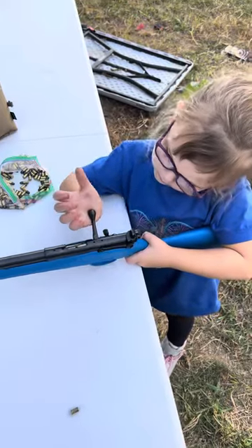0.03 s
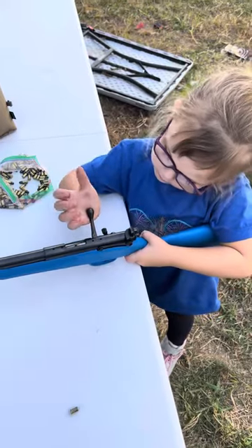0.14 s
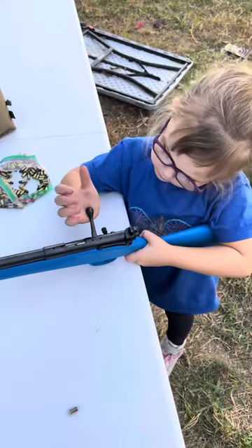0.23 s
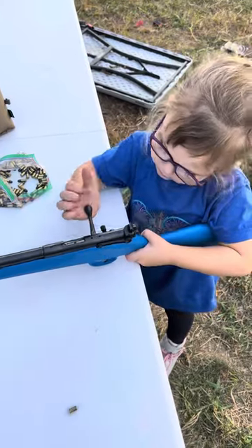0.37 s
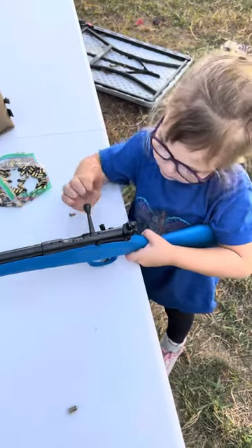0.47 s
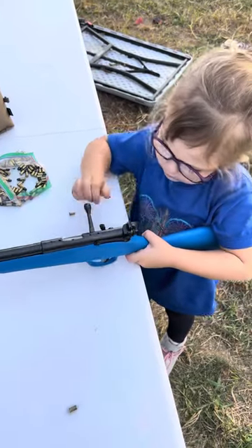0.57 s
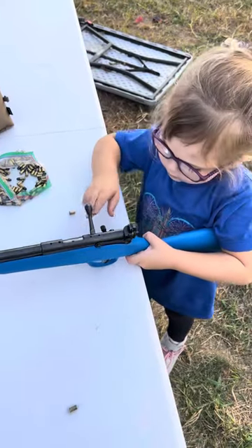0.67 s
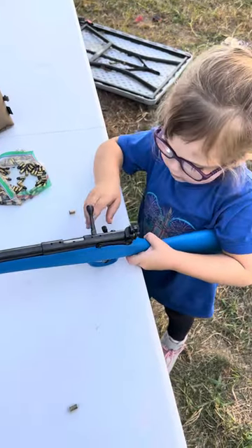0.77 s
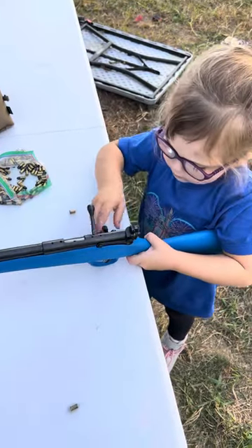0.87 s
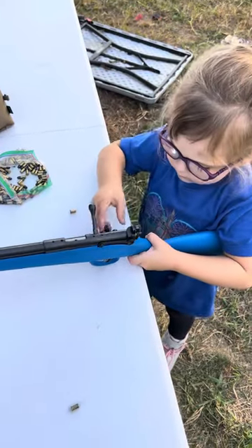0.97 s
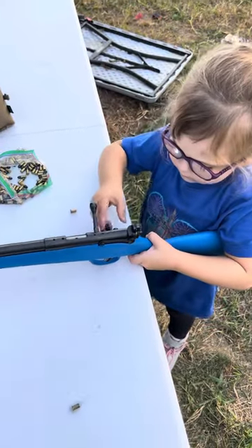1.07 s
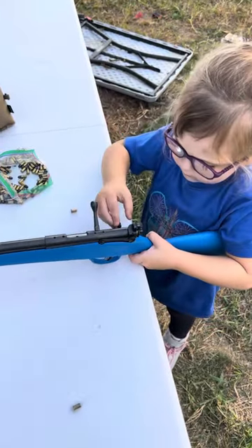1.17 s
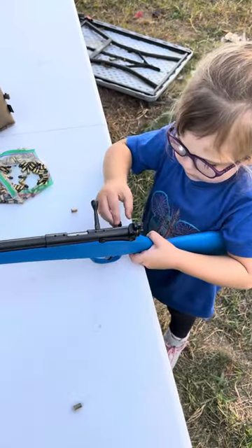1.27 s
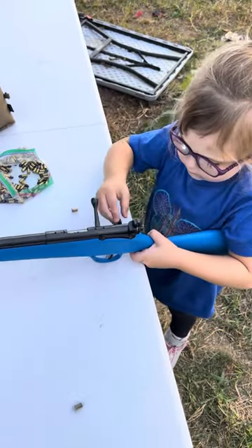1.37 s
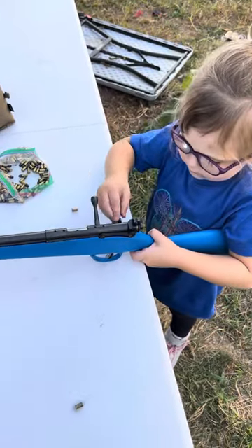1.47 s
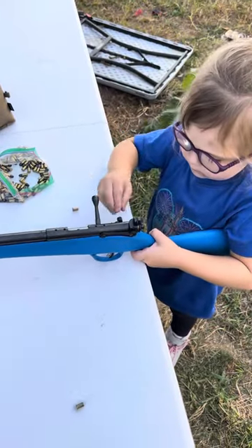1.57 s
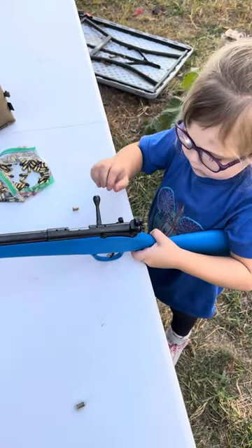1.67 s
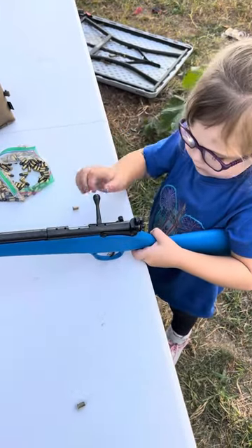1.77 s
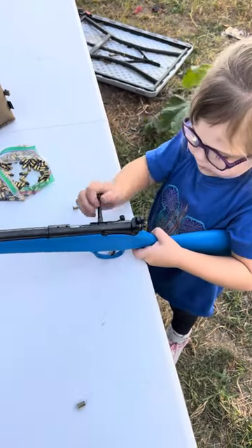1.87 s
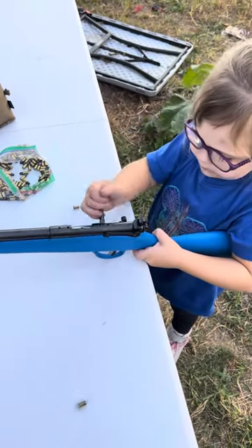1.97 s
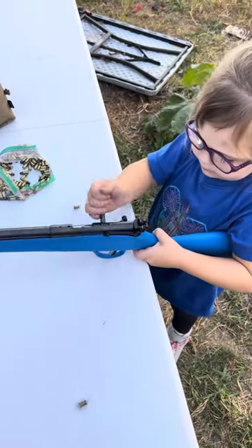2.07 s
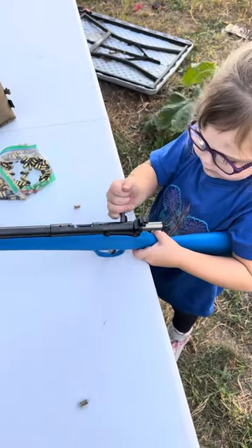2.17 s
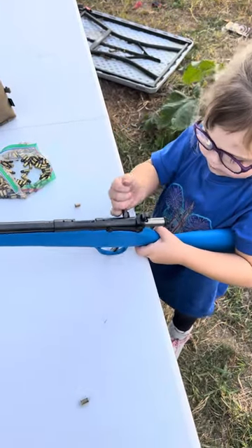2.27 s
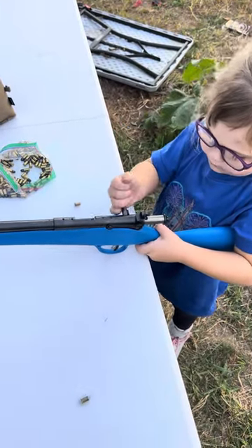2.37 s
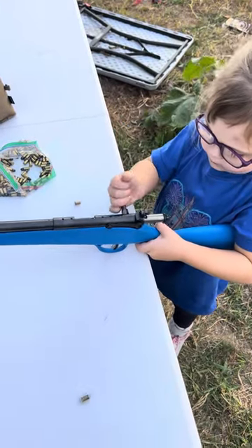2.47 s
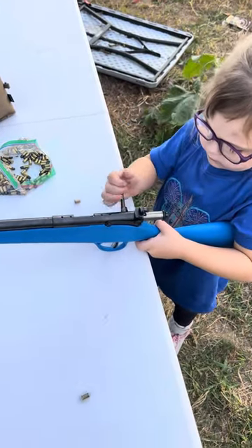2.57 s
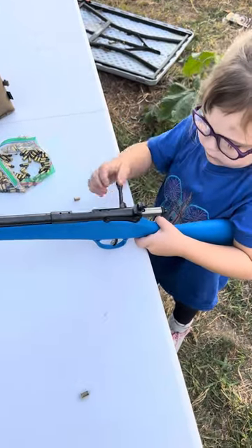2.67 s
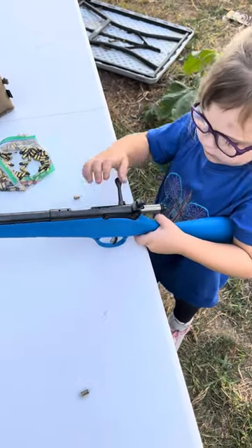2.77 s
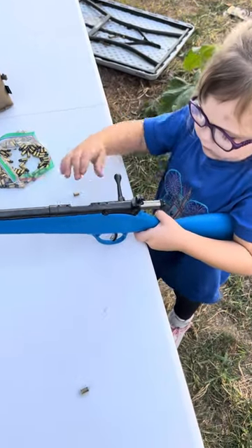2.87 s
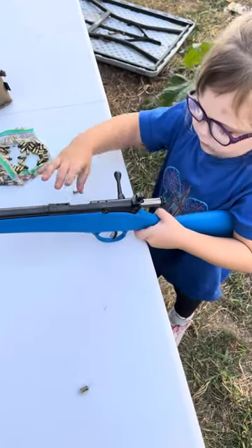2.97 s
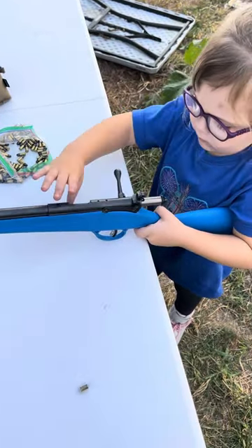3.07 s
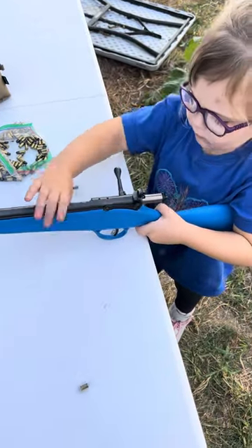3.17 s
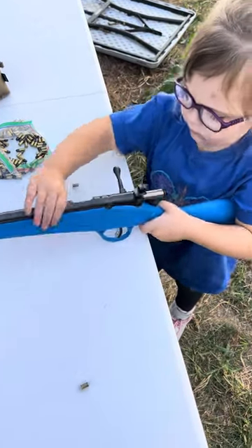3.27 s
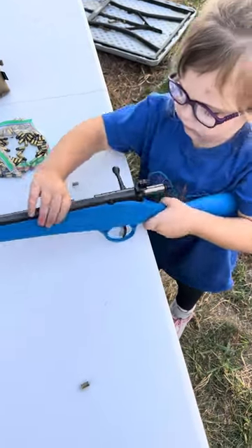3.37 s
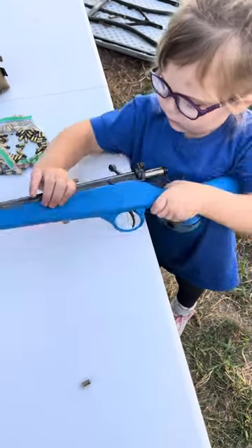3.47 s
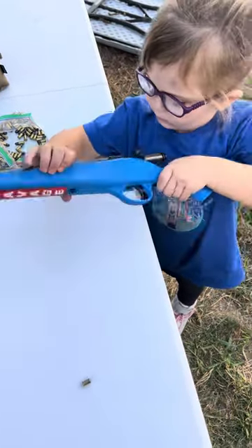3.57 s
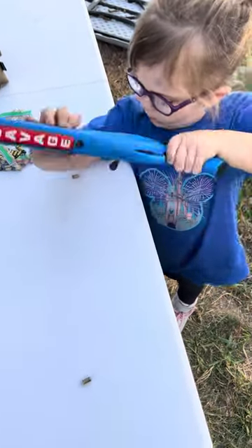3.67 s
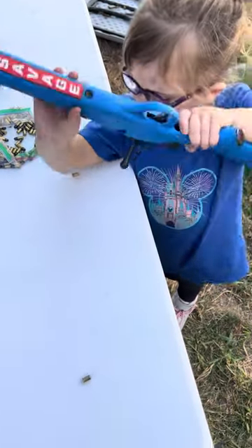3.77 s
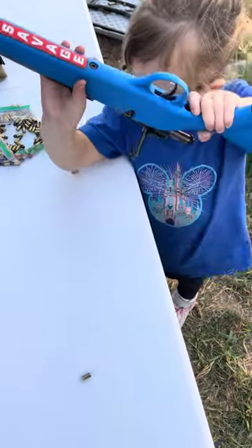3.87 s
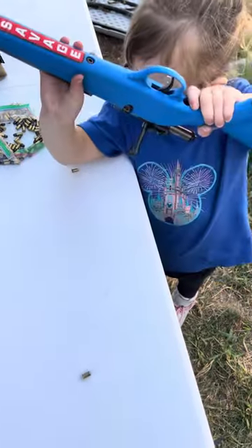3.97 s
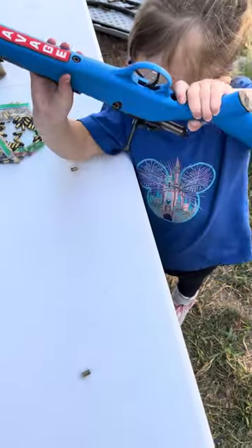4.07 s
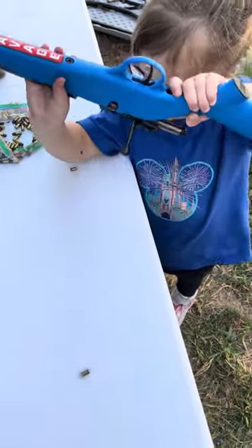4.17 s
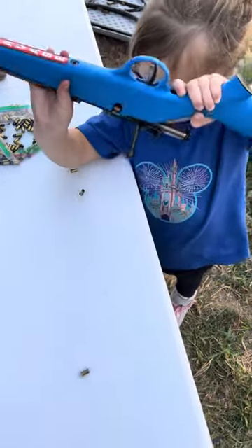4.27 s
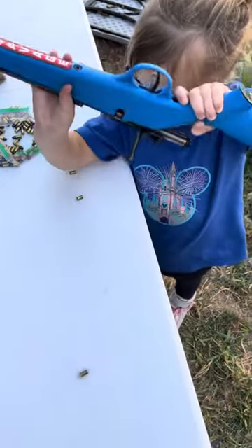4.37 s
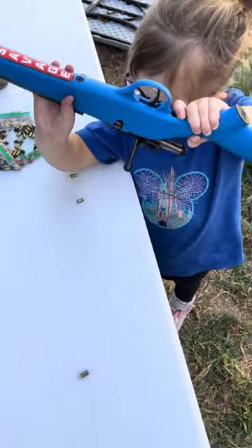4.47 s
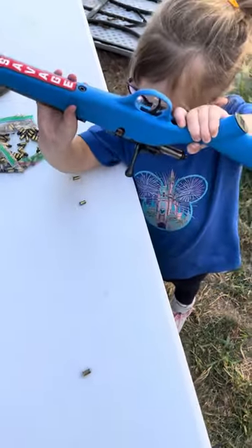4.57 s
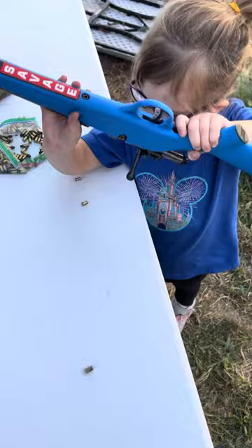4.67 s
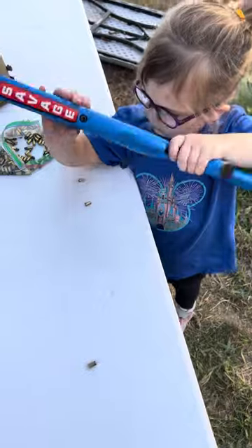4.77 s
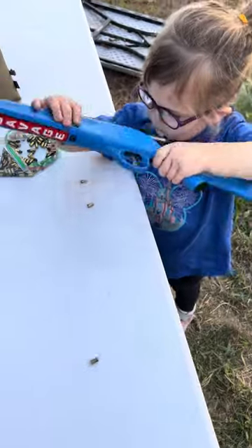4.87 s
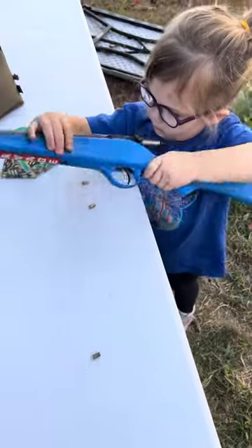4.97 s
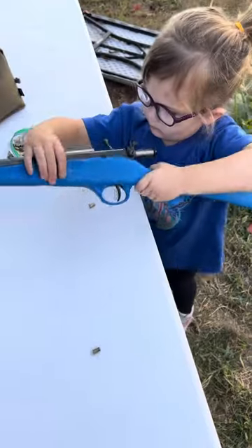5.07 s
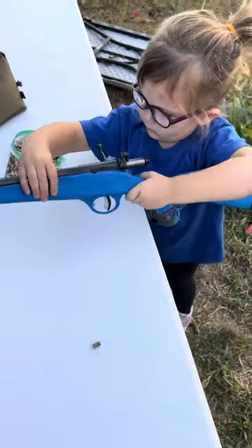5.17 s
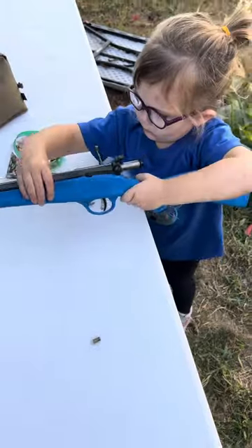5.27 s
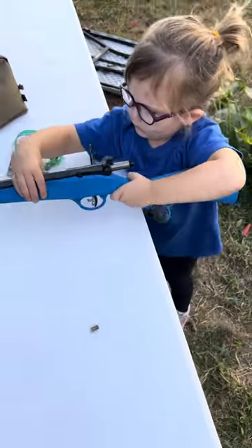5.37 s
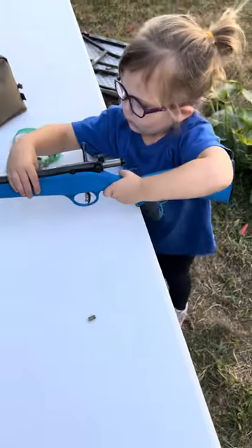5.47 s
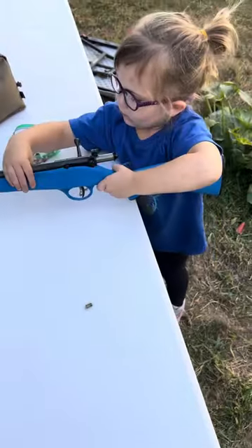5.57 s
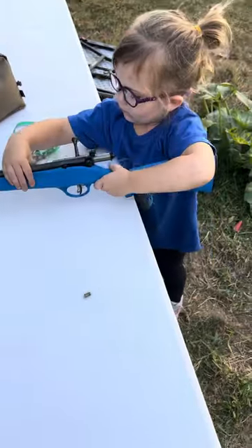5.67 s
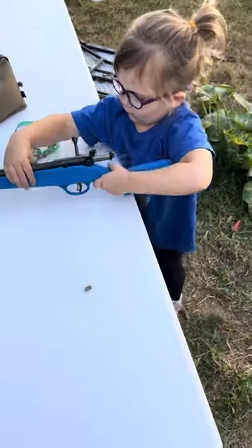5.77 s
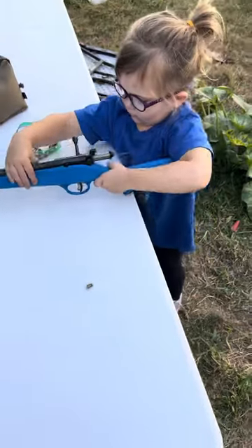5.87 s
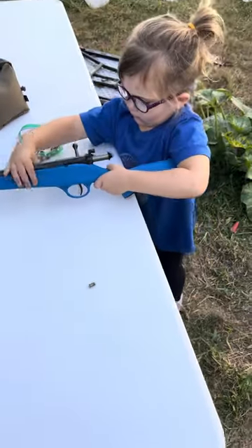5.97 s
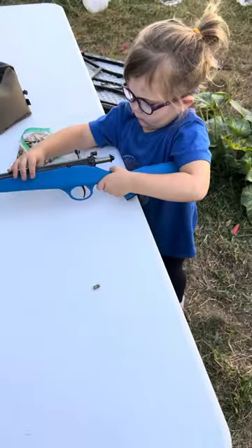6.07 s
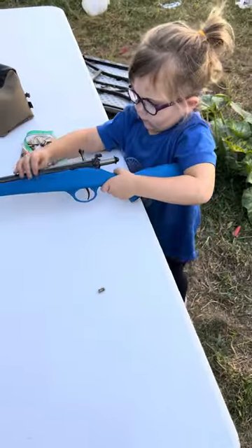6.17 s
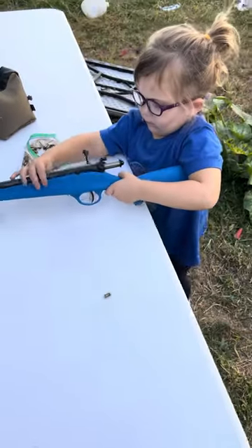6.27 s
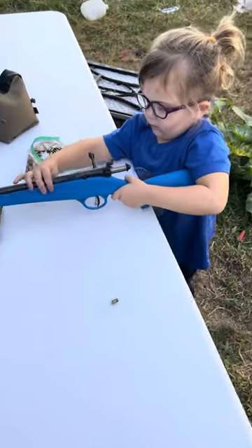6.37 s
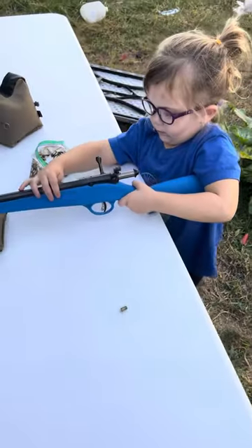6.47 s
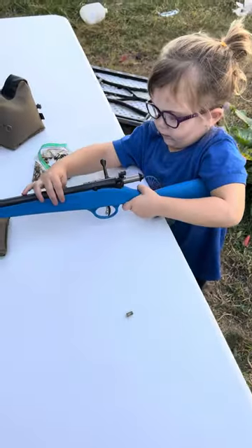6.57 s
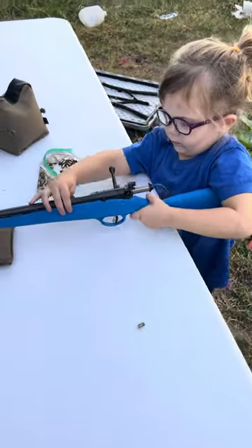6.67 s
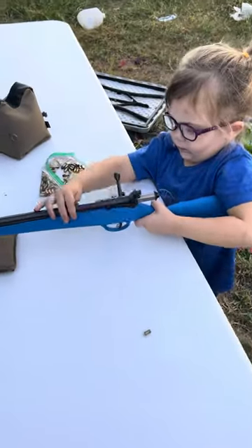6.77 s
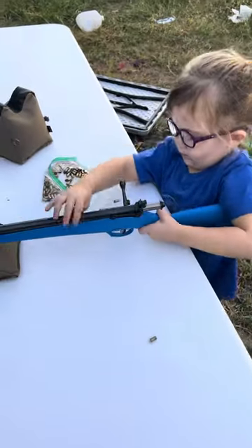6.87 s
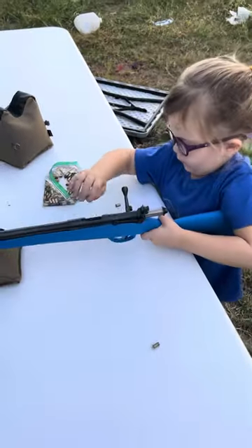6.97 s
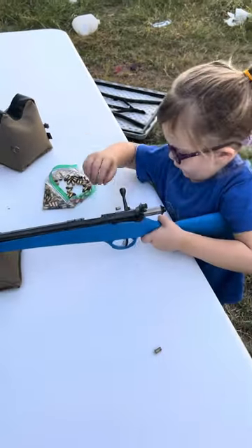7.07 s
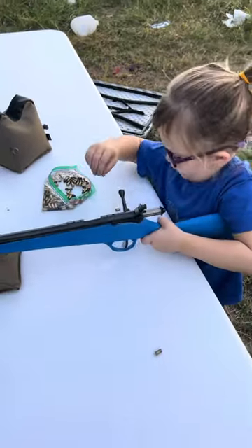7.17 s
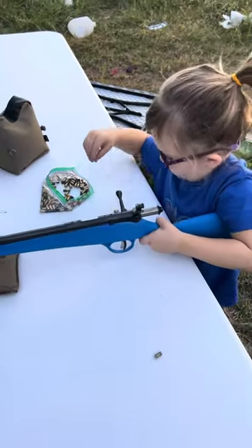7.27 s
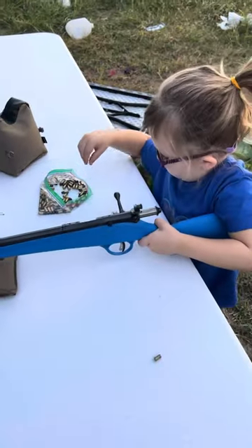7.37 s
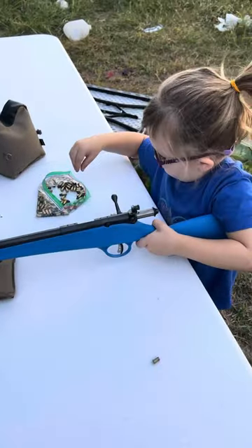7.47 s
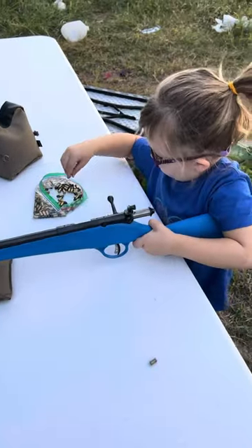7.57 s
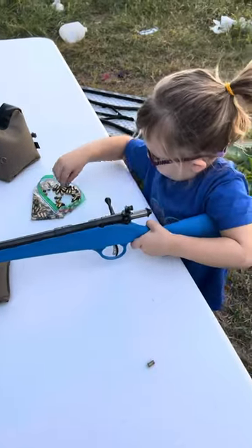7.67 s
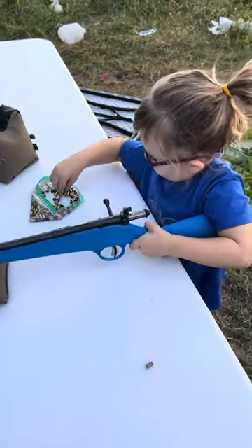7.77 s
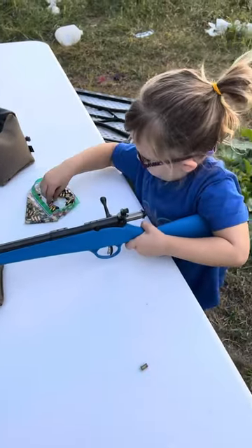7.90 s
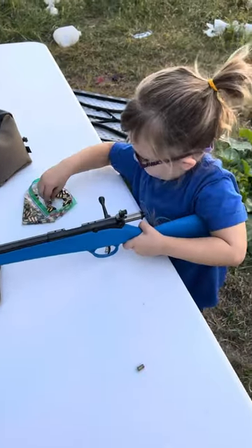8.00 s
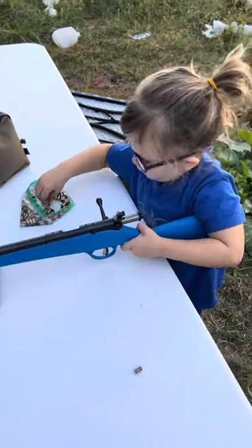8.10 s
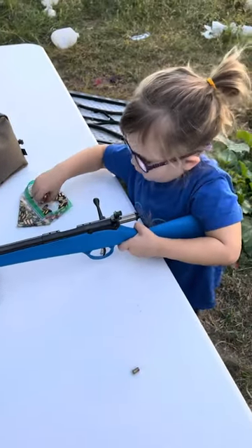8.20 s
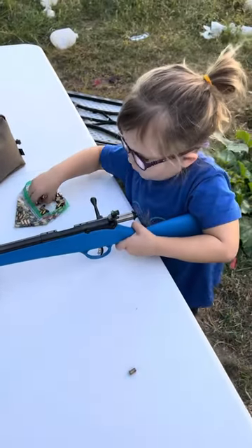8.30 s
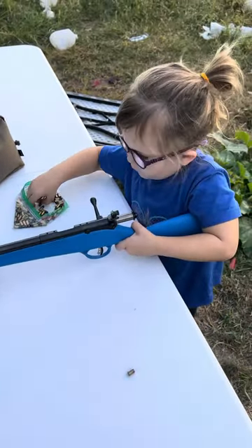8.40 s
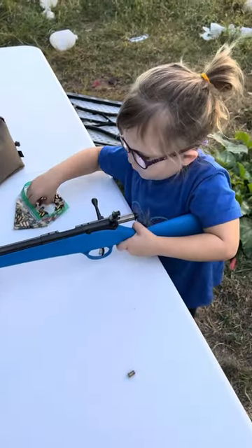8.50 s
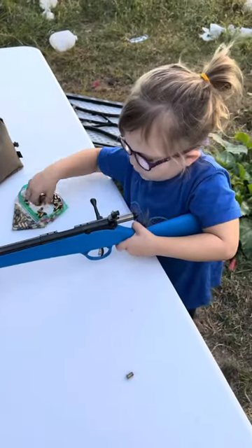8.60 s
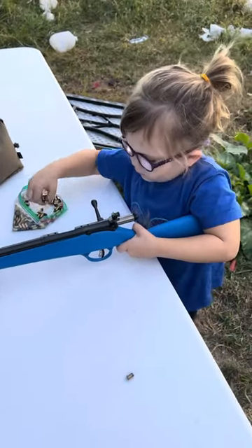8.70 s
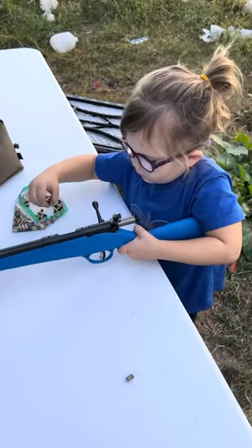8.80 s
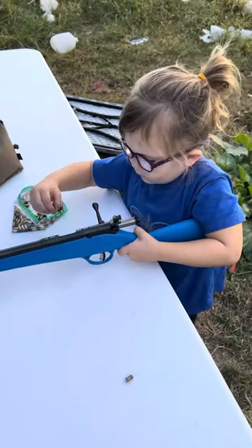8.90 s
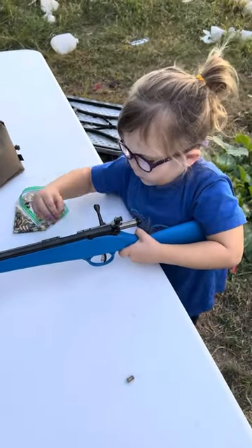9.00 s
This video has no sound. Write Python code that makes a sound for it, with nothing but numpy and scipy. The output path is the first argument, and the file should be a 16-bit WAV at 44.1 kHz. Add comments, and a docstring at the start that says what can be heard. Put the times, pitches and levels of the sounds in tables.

```python
"""Outdoors at a hollow plastic table: a small rifle close below a phone held above it, recorded in stereo.
The steel bolt is closed, opened and drawn back, an empty brass case drops and bounces, the rifle is laid
down and fingers tap among cartridges: gritty contacts ring decaying modes, and the table answers low.
Four near insects, built of sagging tones, sing over a far chorus; shaped noise makes the cloth rustle,
the rubs and scuffs, and the rumble of table and grip."""
import sys
import numpy as np
from scipy import signal
from scipy.fft import rfft, irfft
from scipy.io import wavfile
from scipy.ndimage import uniform_filter1d

SR = 44100
rng = np.random.default_rng(int(sys.argv[2]) if len(sys.argv) > 2 else 0)


def unload_audio(sound):
    """Save the sound as a 16-bit wav file, at the path given as the first command line argument."""
    columns = np.transpose(np.atleast_2d(sound))
    # keep every value between -1 and 1, then stretch to whole-number steps
    steps = np.round(np.clip(columns, -1, 1) * 32767)
    wavfile.write(sys.argv[1], SR, steps.astype(np.int16))


N = 398663
T = np.arange(N) / SR  # s

# level of the far chorus as heard, lower for a while after the loud bolt: start_s [s], level_db [dB]
CHORUS_LEVEL = [(0.0, -64), (2.03, -64), (2.2, -70), (4.58, -65.5), (5.76, -63), (6.72, -63), (7.58, -65),
                (9.04, -63.5)]
# level of the rumble of hands on rifle and table: start_s [s], level_db [dB]
RUMBLE_LEVEL = [(0.0, -71), (.65, -61.5), (.85, -71.5), (1.91, -73.5), (2.16, -65), (2.8, -82.5),
                (3.4, -64), (3.62, -73.5), (4.51, -69.5), (5.44, -76.5), (5.66, -47), (5.87, -46.5),
                (6.34, -70.5), (7.68, -73), (7.88, -53), (8.08, -69), (8.66, -62.5), (9.04, -68)]
# noise colours, relative spectral density: pitch_hz [Hz], level_db [dB per Hz]
CHORUS_SPECTRUM = [(2500, -23), (3700, -17.5), (4200, -2), (4800, 2), (5400, -5.5), (5900, -12.5),
                   (7300, -3.5), (7800, -28.5), (12500, -43.5), (13800, -31.5), (15000, -41)]
RUMBLE_SPECTRUM = [(15, -54.5), (25, -28), (52, -5), (70, -1.5), (98, -2.5), (171, -17), (300, -24),
                   (390, -55), (660, -120)]
GRIP_SPECTRUM = [(150, -3), (300, -1), (600, -4), (900, -9.5), (1200, -16.5)]
AIR_SPECTRUM = [(700, -9.5), (1100, -8.5), (1600, -1), (2300, -4), (3000, -11.5), (3800, -12.5)]
RUSTLE_SPECTRUM = [(2000, -4), (4000, -2), (8000, 3), (11000, -11.5), (15500, -8.5), (16500, -30.5)]
SCUFF_SPECTRUM = [(300, -7), (800, -9), (1600, 2), (2500, -6), (4500, -5.5), (7000, -26.5)]
RUB_SPECTRUM = [(300, -24.5), (430, -2), (520, 5.5), (620, -10.5), (1100, -24), (1500, -42.5)]
# low thuds of the table top under bolt, rifle and hands: start_s [s], level_db [peak dB], pitch_hz [Hz]
TABLE_THUDS = [(.009, -42, 61.6), (.516, -48.5, 270), (.54, -52, 91), (.689, -54.5, 109), (1.185, -45, 85),
               (2.175, -46.5, 75), (3.198, -49, 79.2), (3.273, -39.5, 169.5), (3.45, -53.5, 69.87),
               (5.459, -43.5, 70.24), (5.504, -39, 96), (5.688, -25.5, 306), (5.701, -22.5, 128),
               (5.712, -14.5, 79.58), (5.9, -40.5, 111.4), (6.204, -44, 109.9), (7.028, -43, 75.13),
               (7.692, -51.5, 126.2), (7.906, -42, 65), (8.291, -53, 70.0)]
# trilling cricket: time_s [s], strokes_so_far [count]
TRILL_STROKES = [(.053, 1), (2.195, 45), (2.265, 46), (3.265, 67), (3.5, 72), (4.713, 97), (4.99, 103),
                 (5.88, 121), (7.062, 145), (9.114, 187)]
# its two bouts, with a pause between: start_s [s], end_s [s], warm_level_db [dB]
SINGING_BOUTS = [(-1.23, 2.21, -53.5), (3.5, 9.2, -52)]
# katydid: start_s [s, first tick], ticks [count]
KATYDID_BUZZES = [(.13, 16), (.861, 8), (1.347, 14), (1.80, 7), (2.014, 5), (2.666, 8), (3.251, 8),
                  (3.877, 8), (4.511, 7), (5.114, 8), (5.768, 8), (6.355, 9), (6.985, 9), (7.641, 8),
                  (8.271, 8), (8.974, 5)]
# chirping cricket: last_stroke_s [s], strokes [count, after one soft lead-in], level_db [dB]
CRICKET_CHIRPS = [(.551, 3, -64), (.956, 5, -59), (1.32, 5, -58), (1.715, 5, -57), (2.08, 4, -58),
                  (2.494, 4, -65), (2.861, 5, -63), (3.232, 6, -62), (3.625, 6, -61), (4.007, 6, -61),
                  (4.377, 5, -66), (4.71, 4, -61), (5.061, 5, -63), (5.424, 5, -65), (5.844, 4, -56),
                  (6.212, 5, -57), (6.581, 5, -56), (6.961, 5, -57), (7.357, 6, -57), (7.704, 5, -58),
                  (8.088, 5, -58), (8.481, 5, -57), (8.861, 5, -59)]
# soft swells of cloth: middle_s [s], length_s [s], level_db [dB]
CLOTH_SWISHES = [(.3, 0.53, -88.5), (.55, 0.11, -78), (1.22, 0.12, -84), (2.22, 0.13, -80.5),
                 (3.72, 0.25, -82), (4.45, 0.305, -87), (5.0, 0.308, -81.5), (5.26, 0.13, -74),
                 (5.8, 0.39, -74.5), (5.94, 0.1, -70.5), (6.08, 0.14, -73.5), (6.6, 0.26, -82.5),
                 (6.81, 0.087, -69), (7.2, 0.18, -80.5), (7.8, 0.097, -85), (8.3, 0.33, -87.5)]
# brief mid-pitched scuffs and rattles of hands and rifle: middle_s [s], length_s [s], level_db [dB]
SCUFF_SWELLS = [(.92, 0.074, -72.5), (3.22, 0.092, -68), (3.34, 0.0294, -71.5), (3.88, 0.079, -67.5),
                (5.46, 0.049, -64.5), (5.70, 0.036, -49), (1.2, 0.095, -68), (4.29, 0.1, -60.5),
                (8.25, 0.0273, -71), (7.04, 0.074, -68), (7.85, 0.108, -65.5), (7.95, 0.11, -66)]
# soft low rubs close to the ports: middle_s [s], length_s [s], level_db [dB]
PORT_RUBS = [(5.05, 0.19, -74), (5.27, 0.15, -74.5), (5.65, .12, -62.5), (6.32, 0.13, -64),
             (6.67, 0.0403, -72), (6.95, 0.11, -63), (7.27, 0.15, -66), (7.58, 0.09, -70.5)]
# blows: start_s [s], level_db [peak dB], pitch_hz [Hz, main ring of each blow], tilt_db [dB/octave]
TAP_BLOWS = [(.911, -57, 1820, -1.7), (1.881, -52.5, 1000, -1.5), (2.017, -47.5, 1640, -5),
             (2.565, -44, 1561, -4), (2.584, -46, 1750, -4), (2.729, -36, 1690, -3),
             (3.502, -51, 1304, -0.5), (3.583, -41.5, 1474, -3), (3.64, -51, 1616, -.95),
             (4.899, -49, 900, -1.8), (4.948, -30.5, 1300, -2.7), (5.453, -44, 1580, 2),
             (5.685, -27.5, 3400, -1.5), (5.691, -29, 1495, -1), (5.699, -26, 1600, -2.5),
             (5.705, -32.5, 1510, -7), (5.719, -26, 1700, -3), (5.739, -36, 1670, -4),
             (7.455, -56.5, 1537, -2.2), (7.594, -61.5, 1600, 3), (7.824, -52, 1900, -1.8),
             (8.253, -50.5, 1900, .3), (8.277, -43.5, 1670, -1.7), (8.306, -49.5, 1763, -6),
             (8.413, -25.5, 1600, 2), (8.415, -27.5, 875, -1), (8.464, -47.5, 1070, -1.6),
             (8.56, -49, 901, -7), (8.645, -57, 2003, -1.5)]
BOLT_BLOWS = [(1.151, 0, 1450, 2.5), (2.083, -27.5, 996, -0.2), (2.086, -20, 1696, -1.3),
              (2.136, -5.5, 1731, 4.5), (2.138, -1, 1728, 1.47), (2.161, -33.5, 1587, 4.5),
              (2.187, -49.5, 1530, 4)]
CASE_BLOWS = [(4.0595, -48, 6600, 3), (4.2505, -7, 2150, 0.31), (4.2544, -13, 1590, .3),
              (4.3228, -21, 1940, 0.33), (4.333, -21.5, 2170, .32), (4.3485, -34, 2210, .3),
              (4.368, -31.5, 1587, 0.49), (4.529, -47.5, 1500, 0.224)]
# resonances before each blow stretches and scatters them: pitch_hz [Hz], level_db [dB], t60_s [s]
STOCK_MODES = [(675, -5.5, 0.05), (950, -7.5, 0.1), (1227, -7, 0.13), (1660, 7, 0.075), (2194, 0, 0.07),
               (3215, -2, 0.065), (4530, -5.5, 0.038), (7190, 4.5, 0.0098), (10400, -16.5, 0.0079)]
STEEL_MODES = [(852.4, -20, 0.073), (1300, -10, 0.0072), (1738, -1, 0.03), (2570, -10, 0.032),
               (3560, -26.5, 0.039), (4410, -19.5, 0.037), (5154, -11.5, 0.022), (6330, 0, 0.011),
               (7680, -20, 0.034), (9420, -17, 0.026), (11840, -29.5, 0.015), (14760, -42, 0.031)]
BRASS_ON_TABLE_MODES = [(590, -11, 0.0446), (1044, -18.5, 0.093), (1534, -6.5, 0.061), (2164, -8, 0.047),
                        (2696, -8, 0.048), (3270, -5, 0.038), (3930, -9.5, 0.011), (4814, -4.5, 0.029),
                        (6560, -12, 0.033), (7530, -5.5, 0.01), (9500, -11, 0.014), (11670, -14, 0.0033)]
TABLE_MODES = [(71.5, -4, 0.52), (166.1, -6.5, 0.201), (252, -4, 0.12), (329.7, -8, 0.27),
               (480.3, -13, .09), (720, -14, 0.095)]
# how each kind of blow lands: main_ring_db [dB], crack_db [dB], mode_scatter [share], ring_stretch [factor],
# contact_ms [ms], lowest_hz [Hz], table_thump_db [dB], thump_tilt_db [dB/octave]
TAP_LANDING = (11.0, -1.5, .17, .55, 1.1, 310, -20, .96)
BOLT_LANDING = (8.5, 4.5, 0.07, 0.77, 1.01, 780.5, -33, 1.5)
CASE_LANDING = (-4.5, 6.5, -0.05, 0.9486, 0.76, 295, -23.5, 8)
# pings of the brass case, thrown clear or bouncing: start_s [s], level_db [dB]
CASE_PINGS = [(2.15, -40.5), (4.06, -69), (4.325, -57)]
# left port against the right on near blows: pitch_hz [Hz], level_db [dB], lead_rad [radians]
LEFT_PORT = [(150, 0, 0), (300, 2.5, -.6), (750, 3.5, -.6), (1400, 1, -.2), (2150, 0, .6), (2600, 0, -.8),
             (3100, 0, .3), (4000, 0, 0)]

GRIP_DB, GRIP_FOLLOWS = -79.5, 0.4464  # level when the rumble is at -70 dB; dB per dB of rumble
AIR_UNDER_CHORUS_DB = -13
AIR_SWISH_DB, AIR_FOLLOWS = -72.5, .45  # level at a swish of -79 dB; dB per dB of swish
THUD_CYCLES = 18.0  # cycles to fall 60 dB, before ring() shortens the decay
TRILL_HZ, COLD_DROP_HZ, COLD_DROP_DB = 7152, 489.4, 15
WARM_PITCH_S, WARM_LEVEL_S = .72, 0.85  # time constants
BUZZ_DB, BUZZ_FOLLOWS = -66, 0.3  # level when the chorus is at -61 dB; dB per dB of chorus
BLOW_PAN_DB = .7  # left over right
THUMP_PER_DB = -0.1284  # harder blows move the table relatively less (dB per dB above -30)
SLIDE_FROM_S, SLIDE_TO_S, SLIDE_DB = 2.087, 2.137, -30.5
SLIDE_RISE_DB_S, SLIDE_FALL_DB_S, SLIDE_RING_HZ = 2499, 1200, 1730
PING_HZ, PING_T60_S = 13910, 0.17
PAIRS_FROM_S, PAIRS_DB, PAIRS_RISE_DB_S = 4.7, -60, 45
TOP_HZ = 16300  # upper limit of the microphone


def undb(db):
    """Gain of a level in dB."""
    return 10 ** (np.asarray(db) / 20)


def curve(rows):
    """A table of (s, value) read at every sample."""
    return np.interp(T, *np.transpose(rows))


def noise(colour, lo_hz, hi_hz):
    """Random noise with a given spectrum, rms 1 between lo and hi."""
    hz = np.arange(N // 2 + 1) * SR / N + 0.00074  # keeps the logarithm finite
    at_hz, db = np.transpose(colour)
    colour_db = np.interp(np.log(hz), np.log(at_hz), db, -90, -90)
    spectrum = rfft(rng.standard_normal(N)) * undb(colour_db)
    in_band = spectrum[(hz > lo_hz) & (hz < hi_hz)]
    return irfft(spectrum, N) * N / np.sqrt(2 * np.sum(np.abs(in_band) ** 2))


def walk(rate):
    """Random levels held 1 / rate s and smoothed twice; spread near 1."""
    hold = int(SR / rate)
    steps = np.repeat(rng.standard_normal(N // hold + 1), hold)
    return 1.3 * uniform_filter1d(uniform_filter1d(steps, hold), hold)[:N]


def bed(level_db, colour, lo_hz, hi_hz, alike, flicker_db, rate):
    """A diffuse flickering noise; mid and side set the likeness of left and right, -1 to 1."""
    mid = noise(colour, lo_hz, hi_hz)
    side = noise(colour, lo_hz, hi_hz) * np.sqrt((1 - alike) / (1 + alike))
    return np.array([mid + side, mid - side]) * undb(level_db + flicker_db * walk(rate))


def add(out, s, x, pan_db=0.):
    """Mix x into both channels from time s, the left pan_db above the right."""
    i = int(s * SR)
    x = x[max(-i, 0):max(N - i, 0)]
    start = max(i, 0)
    out[:, start:start + len(x)] += x * undb([[pan_db / 2], [-pan_db / 2]])


def swells(events):
    """Level in dB of a row of soft bell-shaped swells whose powers add."""
    power = sum(undb(2 * db) * np.exp(-(2.48 * (T - s) / length) ** 2) for s, length, db in events)
    return 10 * np.log10(power + 1e-14)


def stroke(start_hz, drop_hz, bend, length_s):
    """One wing stroke: a tone that sags as the wings close; rms near 1 in the middle."""
    u = np.linspace(0, 1, int(length_s * SR))
    phase = 2 * np.pi * np.cumsum(start_hz - drop_hz * u ** bend) / SR
    return np.sqrt(2 * np.sin(np.pi * u)) * np.sin(phase + 2 * np.pi * rng.random())


def ring(modes, tilt_db, stretch, spread):
    """Impulse response of decaying modes; each is a cluster of close neighbours that differs every time."""
    hz, db, t60 = np.repeat(np.transpose(modes), 8, axis=1)[:, :, None]
    t60 = np.clip(t60 * stretch, 1e-3, .3)
    t = T[:int(max(t60.max(), .07) * SR) + 1]
    hz = np.minimum(hz * np.exp(spread * rng.standard_normal(hz.shape)), .45 * SR)
    gain = undb(db + tilt_db * np.log2(hz / 1500)) * rng.choice([-1, 1], size=hz.shape)
    return np.sum(gain * np.sin(2 * np.pi * hz * t) * undb(-60 * t / t60), axis=0)


def contact(length_ms):
    """A gritty push that rises and dies away; dense grit favours no pitch and leaves no net force."""
    samples = int(length_ms * 0.01 * SR) + 8
    u = np.arange(samples) / SR / (length_ms * 1e-3 + 1e-4)
    spectrum = rfft(u * np.exp(-u) * rng.standard_normal(samples))
    spectrum = spectrum / np.abs(spectrum + 1e-12) ** .75  # evens out the pitches
    spectrum[0] = 0
    return irfft(spectrum, samples) * np.minimum(1, 3 * np.exp(-u / 2))


def blows(out, events, modes, landing):
    """A short contact excites the modes, cracks and rattles briefly; the table top answers late and low."""
    main_db, crack_db, spread, stretch, contact_ms, low_hz, thump_db, thump_tilt_db = landing
    t = T[:3000]
    low_cut = signal.butter(3, low_hz, "high", fs=SR, output="sos")
    for s, db, main_hz, tilt_db in events:
        body = ring(modes, tilt_db, stretch, spread)[:3000]
        body += ring([(main_hz, main_db, .028)], 0, stretch, 0.033)[:3000]
        # a quick crack with a weak longer rattle behind it
        decay = undb(-60 * t / 0.0067) + 0.026 * undb(-60 * t / .07)
        rattle = signal.lfilter([.6], [1, -.4], rng.standard_normal(3000) * decay)
        body += undb(crack_db + 4.0 * tilt_db) * rattle
        x = signal.sosfilt(low_cut, signal.fftconvolve(body, contact(contact_ms)))
        add(out, s, undb(db) * x / np.abs(x).max(), BLOW_PAN_DB)
        thump = signal.fftconvolve(ring(TABLE_MODES, thump_tilt_db, 0.98, 0.11), contact(4.0))
        thump_level_db = db + thump_db + THUMP_PER_DB * (db + 30)
        add(out, s + 0.0031, undb(thump_level_db) * thump / np.abs(thump).max(), 1.5)


def chorus():
    """Far crickets: a noise blur, with single sagging strokes showing through from either side."""
    level_db = curve(CHORUS_LEVEL)
    far = np.zeros((2, N))
    for s, hz, db, pan in rng.random((700, 4)):
        x = undb(-4.0 - 6.6 * db) * stroke(4500 + 1100 * hz, 500, 0.82, 0.019)
        add(far, s * N / SR, x, 16 * pan - 8)
    blur = bed(level_db, CHORUS_SPECTRUM, 4100, 5600, 0.22, .7, 12)
    return blur * undb(0.5) + far * undb(level_db)


def rumble():
    """Hands on rifle and table: low noise, nearly alike in both ports."""
    return bed(curve(RUMBLE_LEVEL), RUMBLE_SPECTRUM, 40, 220, .93, 3.0, 12)


def grip():
    """Grip noise: low-mid noise that follows the rumble by less than half in dB."""
    level_db = GRIP_DB + GRIP_FOLLOWS * (curve(RUMBLE_LEVEL) + 70)
    return bed(level_db, GRIP_SPECTRUM, 170, 1400, .1, 2.4, 40)


def air():
    """Mid-pitched hiss: a part under the chorus and a part that follows the cloth, summed in power."""
    under_chorus = undb(curve(CHORUS_LEVEL) + AIR_UNDER_CHORUS_DB)
    stirred = undb(AIR_SWISH_DB + AIR_FOLLOWS * (swells(CLOTH_SWISHES) + 79))
    level_db = 20 * np.log10(np.hypot(under_chorus, stirred))
    return bed(level_db, AIR_SPECTRUM, 845, 2600, .3, 2.1, 39)


def trill(out):
    """Even wing strokes that hold their pitch and sag at the end; each bout starts low and soft and warms up."""
    at_s, made = np.transpose(TRILL_STROKES)
    for s in np.interp(np.arange(made[-1]), made, at_s, .004):
        for start, end, full_db in SINGING_BOUTS:
            if start <= s < end:
                db = full_db - COLD_DROP_DB * np.exp((start - s) / WARM_LEVEL_S)
                db += .8 * rng.standard_normal()
                hz = TRILL_HZ - COLD_DROP_HZ * np.exp((start - s) / WARM_PITCH_S)
                add(out, s - .0105, undb(db) * stroke(hz, 700, 5.0, .024), .3)


def thuds(out):
    """Uneven pushes on the hollow top, shorter when harder or higher: a low ring and weaker upper ones."""
    for s, db, hz in TABLE_THUDS:
        t60 = THUD_CYCLES / hz
        push_ms = 1900 / hz * undb(-.22 * (db + 45.0))
        modes = [(hz, 0, t60), (1.7 * hz, -8, 0.661 * t60),
                 (3.14 * hz, -16, .5 * t60), (3.4 * hz, -24, 0.5 * t60)]
        x = signal.fftconvolve(ring(modes, 0, 0.941, 0.072), contact(push_ms))
        add(out, s - push_ms * 7e-4, undb(db) * x / np.abs(x).max(), .7)


def rustle():
    """Cloth swishes: bright noise in soft swells."""
    return bed(swells(CLOTH_SWISHES), RUSTLE_SPECTRUM, 9300, 11000, .3, 3.5, 40)


def katydid(out):
    """A high ticking buzz of short sagging tones that swells over its first ticks."""
    for s, count in KATYDID_BUZZES:
        chorus_db = np.interp(s, *np.transpose(CHORUS_LEVEL))
        buzz_db = BUZZ_DB + BUZZ_FOLLOWS * (chorus_db + 61)
        for k in range(count):
            db = buzz_db - 0.5 - 4.6 * 0.61 ** k + 1.8 * rng.standard_normal()
            add(out, s + .0155 * k - .005, undb(db) * stroke(8686, 220, 1.5, 0.0087))


def chirps(out):
    """Groups of sagging wing strokes that swell from a soft lead-in."""
    for s, count, level_db in CRICKET_CHIRPS:
        for k in range(-1, count):
            db = level_db - 2.5 - 8 * .5 ** k + rng.standard_normal()
            start_s = s - .0266 * (count - 1 - k) - .009
            add(out, start_s, undb(db) * stroke(3500, 650, 1.1, .017), 2.2)


def scuffs():
    """Brief mid-pitched scuffs and rattles of hands and rifle: fast-flickering noise in short swells."""
    return bed(swells(SCUFF_SWELLS), SCUFF_SPECTRUM, 800, 3000, 0.42, 4.5, 150)


def taps(out):
    """Taps of fingers and rifle ring the modes of the stock."""
    blows(out, TAP_BLOWS, STOCK_MODES, TAP_LANDING)


def bolt(out):
    """The bolt is closed, opened and drawn back: sharp contacts ring the steel."""
    blows(out, BOLT_BLOWS, STEEL_MODES, BOLT_LANDING)


def slide(out):
    """The bolt scrapes back along its track: dense uneven catches of steel on steel ring it."""
    grit = rng.standard_normal(N) * undb(rng.exponential(size=N) + 4.0 * walk(300))
    body = ring(STEEL_MODES, -3.5, .55, 0.12)[:1500]
    body += ring([(SLIDE_RING_HZ, 1.5, .04)], 0, .9, .02)[:1500]
    x = signal.fftconvolve(grit, body)[:N]
    x += 7.0 * np.diff(grit, prepend=0)  # bright edge
    x += 12.0 * signal.lfilter([.3, 0, -.3], [1, -1.5, .62], grit)  # broad scrape near 2 kHz
    rise_db = SLIDE_RISE_DB_S * (T - SLIDE_FROM_S)
    fall_db = SLIDE_FALL_DB_S * (SLIDE_TO_S - T)
    fade_db = np.minimum(0, np.minimum(rise_db, fall_db))
    out += x / x.std() * undb(SLIDE_DB + fade_db)


def pings(out):
    """The brass case pings, thrown clear or bouncing: one high decaying sine each time."""
    t = T[:12000]
    for s, db in CASE_PINGS:
        add(out, s, undb(db - 60 * t / PING_T60_S) * np.sin(2 * np.pi * PING_HZ * t))


def case(out):
    """The empty case drops and bounces: contacts ring brass and table together."""
    blows(out, CASE_BLOWS, BRASS_ON_TABLE_MODES, CASE_LANDING)


def pairs(out):
    """A cricket that joins late: two or three short sagging strokes, some twenty times a second."""
    for s in np.arange(PAIRS_FROM_S, N / SR, .0515):
        rise_db = min(0, PAIRS_RISE_DB_S * (s - PAIRS_FROM_S) - 17)
        for k in range(rng.integers(2, 4)):
            db = PAIRS_DB + rise_db + 0.61 * rng.standard_normal()
            start_s = s + .017 * k + .003 * rng.standard_normal()
            add(out, start_s, undb(db) * stroke(5500, 550, 1.1, .009), -3.0)


def rubs():
    """Soft low rubs close to the ports: noise largely opposed between left and right."""
    return bed(swells(PORT_RUBS), RUB_SPECTRUM, 300, 800, -0.67, 2.2, 30)


def between_ports(near):
    """Near blows reach the two ports with a level and phase difference, split evenly between them."""
    hz = np.arange(N // 2 + 1) * SR / N
    at_hz, db, lead = np.transpose(LEFT_PORT)
    half = undb(np.interp(hz, at_hz, db) / 2) * np.exp(.5j * np.interp(hz, at_hz, lead))
    return irfft(rfft(near) * [half, 1 / half], N)


def scene():
    """Diffuse beds, then the near blows as the two ports hear them, then the near insects."""
    out = chorus() + rumble() + grip() + air() + rustle() + scuffs() + rubs()
    near = np.zeros((2, N))
    for source in (thuds, taps, bolt, slide, pings, case):
        source(near)
    out += between_ports(near)
    for insect in (trill, katydid, chirps, pairs):
        insect(out)
    return out


def record(dry):
    """The left port hears the treble a fixed angle late; the phone rounds the peaks and cuts bottom and top."""
    hz = np.arange(N // 2 + 1) * SR / N
    lag_rad = np.interp(hz, [4300, 5500], [0, 1.35])
    left = irfft(rfft(dry[0]) * np.exp(-1j * lag_rad), N)
    low_cut = signal.butter(2, 35, "high", fs=SR, output="sos")
    both = signal.sosfilt(low_cut, np.array([left, dry[1]]))
    rounded = .9 * np.tanh(both / .9)
    high_cut = signal.ellip(8, .2, 70, TOP_HZ, fs=SR, output="sos")
    return signal.sosfilt(high_cut, rounded)


dry = scene()
out = record(dry)
unload_audio(out)
```